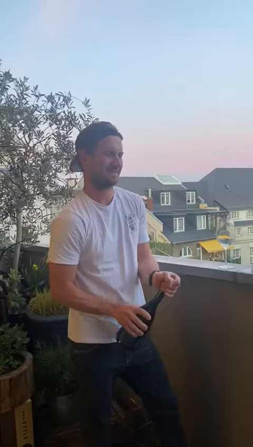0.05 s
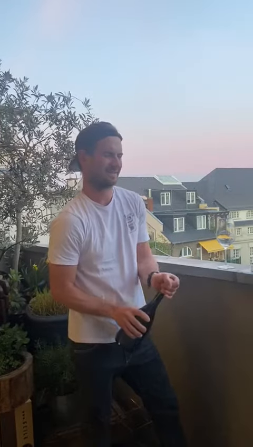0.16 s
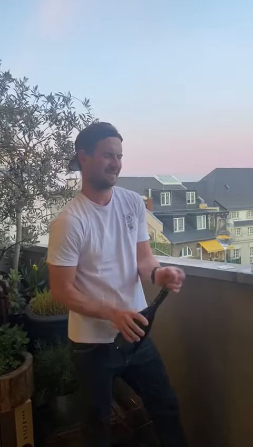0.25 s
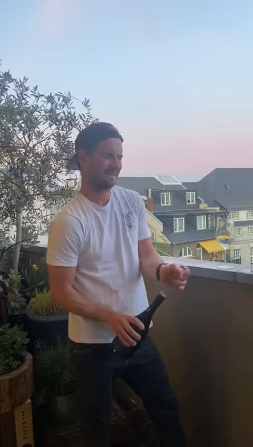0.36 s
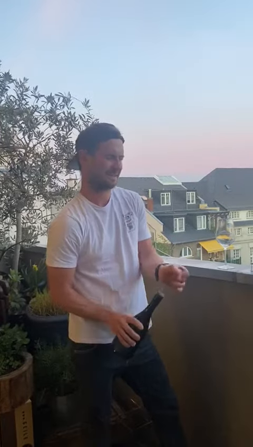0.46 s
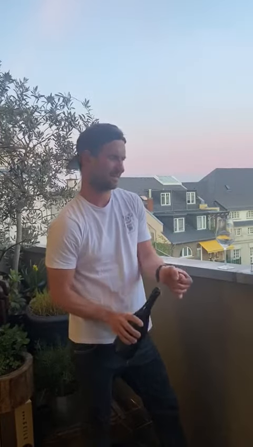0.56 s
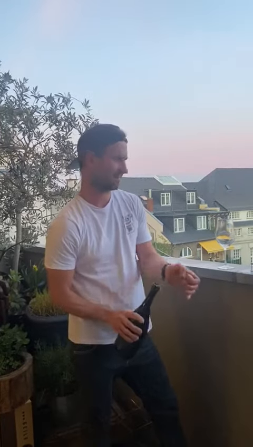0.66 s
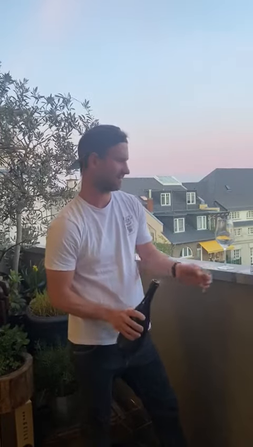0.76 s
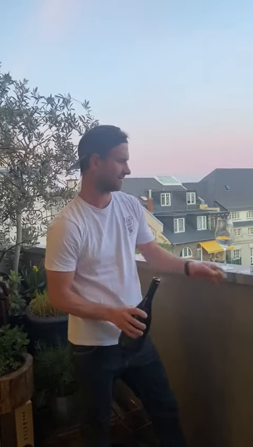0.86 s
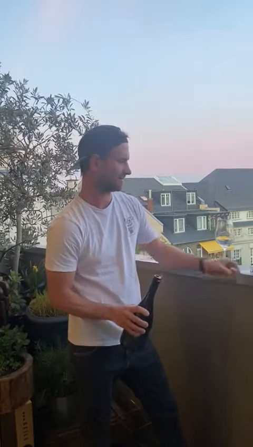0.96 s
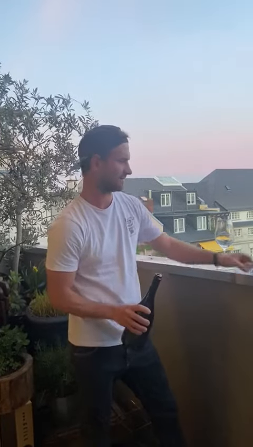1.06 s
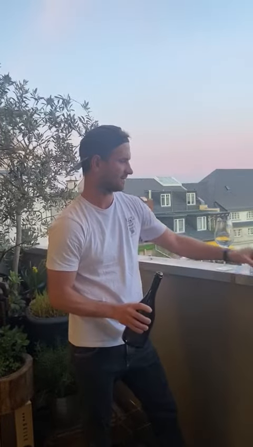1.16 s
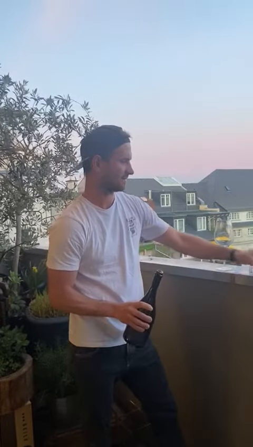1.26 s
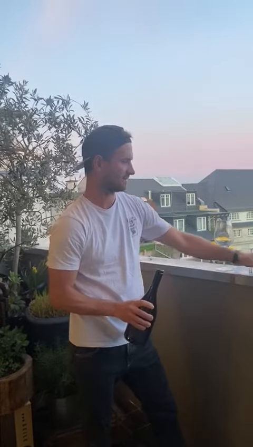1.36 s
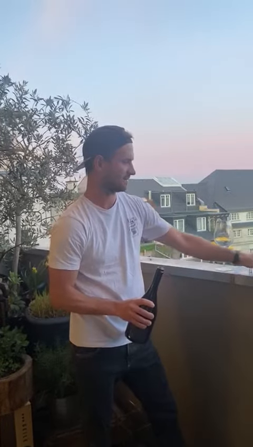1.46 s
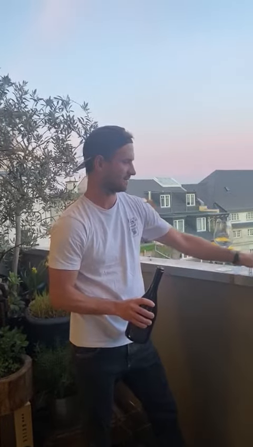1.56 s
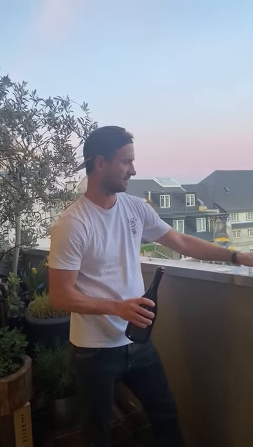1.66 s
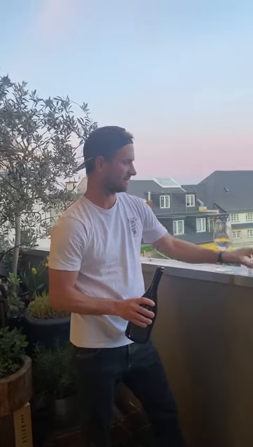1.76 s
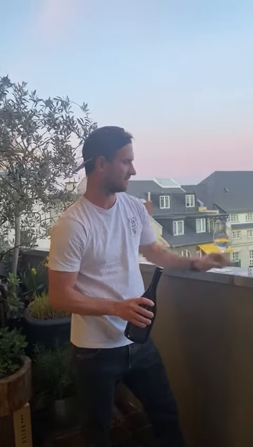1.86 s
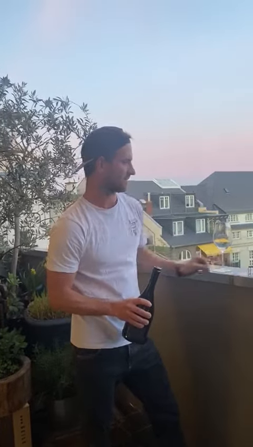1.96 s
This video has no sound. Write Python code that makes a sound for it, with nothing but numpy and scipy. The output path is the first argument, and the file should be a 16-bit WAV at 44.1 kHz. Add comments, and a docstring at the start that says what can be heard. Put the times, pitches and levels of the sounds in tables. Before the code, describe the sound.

Close stereo pickup on an open balcony: one loud cork pop almost at once, brief hiss and fading hollow note, soft echoes from houses opposite, near quiet, then a faint click and scuff of a small object.

```python
"""A town rumbles far off throughout: coloured noise, with faint sine tones late on.
At 0.23 s a cork pops from a sparkling wine bottle on a balcony: noise bursts crack as the seal breaks, decaying
sines thump as the neck's air bounces, and glass, gas hiss and a hollow note follow. Near walls repeat the crack
and thump, a corner honks, the balcony and courtyard add noise tails, and houses send back two soft echoes.
From 1.58 s something small clicks, clinks and scuffs on the parapet under a hand: noise bursts and struck modes."""
import sys
import numpy as np
from scipy import signal
from scipy.fft import rfft, irfft, next_fast_len
from scipy.io import wavfile
from scipy.ndimage import map_coordinates

SR = 44100
rng = np.random.default_rng(int(sys.argv[2]) if len(sys.argv) > 2 else 0)


def to_wav(sig):
    """Store sig (one row per channel, or 1-D mono) as 16-bit WAV at the path in sys.argv[1].

    Samples outside -1..1 are clipped; the rate is SR.
    """
    pcm = np.clip(np.atleast_2d(sig), -1, 1) * 32767
    pcm = np.round(pcm).astype(np.int16)
    wavfile.write(sys.argv[1], SR, pcm.T)  # frames by channels


N = 88200  # samples, two seconds


def amp(db):
    """Decibels to gain."""
    return 10 ** (np.asarray(db) / 20)


def unit(x):
    """Scale to rms 1."""
    return x / np.sqrt(np.mean(x ** 2) + 1e-20)


def along(points, hz):
    """Read a curve of (Hz, value) points on a log frequency axis."""
    f, v = np.transpose(points)
    return np.interp(np.log(hz + 1), np.log(f + 1), v)


def since(s):
    """Seconds since s, zero before."""
    return np.maximum(np.arange(N) / SR - s, 0)


def fade(t, t60):
    """Exponential decay that falls 60 dB in t60 seconds."""
    return np.exp(-np.log(1000) * t / t60)


def burst(s, rise, t60):
    """An envelope that rises at s and dies away."""
    t = since(s)
    return (1 - np.exp(-t / rise)) * fade(t, t60)


def swell(s, width):
    """A bell-shaped envelope around s."""
    return np.exp(-.5 * ((since(0) - s) / width) ** 2)


def wobble(rate):
    """A smooth random curve, rate knots a second."""
    return map_coordinates(rng.standard_normal(N), [np.arange(N) * rate / SR])


def sine(hz):
    """A sine that follows a moving pitch."""
    return np.sin(2 * np.pi * np.cumsum(hz) / SR)


def filtered(x, response):
    """x times a complex response of frequency."""
    m = next_fast_len(N + SR // 2)
    return irfft(rfft(x, m) * response(np.fft.rfftfreq(m, 1 / SR)), m)[..., :N]


def delayed(x, s):
    """x, s seconds later, by a phase turn that allows fractions of a sample."""
    return filtered(x, lambda hz: np.exp(-2j * np.pi * hz * s))


def noise(spectrum, alike):
    """Coloured stereo noise of rms 1; mid and side are weighted for the likeness of the two channels."""
    def mid_side_gains(hz):
        turn = np.arccos(np.clip(along(alike, hz), -1, 1)) / 2
        return amp(along(spectrum, hz)) * np.array([np.cos(turn), np.sin(turn)])

    mid, side = filtered(rng.standard_normal((2, N)), mid_side_gains)
    return unit(np.array([mid + side, mid - side]))


def struck(modes, s):
    """Modes set ringing at s, each with its own level offset and phase in each channel."""
    t = since(s)
    total = 0
    for hz, db, t60 in modes:
        level = amp(db + rng.normal(0, 1.5, (2, 1)))
        phase = rng.random((2, 1))  # in cycles
        total = total + level * burst(s, .0005, t60) * np.sin(2 * np.pi * (hz * t + phase))
    return total


POP_S = .2268  # the seal breaks
CRACK_DB, CRACK_RISE_S, CRACK_T60_S = -9, .00018, .018
# Colour of the crack. Each row: frequency in Hz, relative level in dB per Hz.
CRACK_COLOUR = [(300, -14), (700, 3), (950, 6), (1300, 2), (2000, 2.5), (3200, -1), (5500, -3), (7500, -11),
                (9000, -4), (11500, -7)]
# Stereo likeness of direct sounds. Each row: frequency in Hz, left-right correlation (1 is identical).
DIRECT_ALIKE = [(500, .97), (1100, .8), (2000, .15), (10000, .2)]


def crack():
    """The breaking seal gives a fast-rising burst of noise."""
    return amp(CRACK_DB) * burst(POP_S, CRACK_RISE_S, CRACK_T60_S) * noise(CRACK_COLOUR, DIRECT_ALIKE)


SNAP_DB, SNAP_RISE_S, SNAP_T60_S = -5.5, .0016, .0065
# Colour of the first instant. Each row: frequency in Hz, relative level in dB per Hz.
SNAP_COLOUR = [(600, -8), (1200, 3), (3000, 1), (5500, 2), (7500, -9), (10500, -1)]


def snap():
    """The first instant of the pop is a very short noise burst, heard only directly."""
    return amp(SNAP_DB) * burst(POP_S, SNAP_RISE_S, SNAP_T60_S) * noise(SNAP_COLOUR, DIRECT_ALIKE)


THUMP_S, THUMP_RISE_S = .2295, .00092  # the cork clears the neck just after the crack
# Resonances of the air in neck and bottle. Each row: frequency in Hz, level in dB, t60 in seconds.
NECK_MODES = [(170, -16, 0.058), (258, -12, .06), (343, 0, .052), (494, -11, .045), (565, -18, .04)]


def thump():
    """The air in the neck bounces at its resonances as the cork leaves."""
    t = since(THUMP_S)
    modes = [amp(db) * burst(THUMP_S, THUMP_RISE_S, t60) * np.sin(2 * np.pi * hz * t)
             for hz, db, t60 in NECK_MODES]
    return -sum(modes)  # starts with a downward swing


BOOM_HZ, BOOM_DB, BOOM_RISE_S, BOOM_T60_S = 79, -11.5, .011, .085


def boom():
    """The air in the bottle's shoulder gives a slower, deeper bounce."""
    return -amp(BOOM_DB) * burst(THUMP_S, BOOM_RISE_S, BOOM_T60_S) * np.sin(2 * np.pi * BOOM_HZ * since(THUMP_S))


# Near walls. Each row: delay in seconds, gain of the thump in dB, gain of the crack in dB.
WALLS = [(.0044, -2, -4), (.0095, -11.5, -7), (.0113, -9, -3), (.0133, -28.5, -4), (.015, -13.5, -16),
         (.0200, -27.5, -14)]


def wall_slaps(thump_sound, crack_sound):
    """Each near wall returns the thump and the crack after its own delay."""
    return sum(delayed(amp(thump_db) * thump_sound + amp(crack_db) * crack_sound, delay)
               for delay, thump_db, crack_db in WALLS)


# Modes of the bottle's glass. Each row: frequency in Hz, middle level in dB, t60 in seconds.
GLASS_MODES = [(706, -35, .2), (2118, -40, .33), (2299, -44, .28), (3015, -31, .13), (3413, -37, .15),
               (3880, -36, .12), (4387, -41, .13), (5300, -42, .16), (5771, -44, .16)]


def pop():
    """The seal cracks, the neck's air bounces, near walls repeat both, and the glass rings on."""
    crack_sound = crack()
    thump_sound = thump()
    slaps = wall_slaps(thump_sound, crack_sound)
    return snap() + crack_sound + thump_sound + boom() + slaps + struck(GLASS_MODES, POP_S)


HISS_DB, HISS_RISE_S, HISS_T60_S = -20, .003, .17
# Colour of the escaping gas. Each row: frequency in Hz, relative level in dB per Hz.
HISS_COLOUR = [(500, -18), (700, -2), (860, -10), (1100, -2), (2200, -1), (3500, -2), (5700, -6),
               (7600, -22), (8700, -4), (11000, -5), (12000, -11)]


def gas():
    """Gas leaves the open neck as a short hiss of noise."""
    return amp(HISS_DB) * burst(POP_S, HISS_RISE_S, HISS_T60_S) * noise(HISS_COLOUR, DIRECT_ALIKE)


RING_HZ, RING_SAG_HZ_PER_S, RING_RISE_S = 597, 16, .06  # pitch at the pop, then sinking
RING_WAVER_HZ, RING_FLUTTER_DB = 4, 2.8  # scale of the random pitch and level movement
# Quick and slow decay of the hollow note. Each row: level in dB, t60 in seconds.
RING_DECAYS = [(-24, .44), (-46, 1.8)]


def hollow_note():
    """A sinking, wavering sine lingers after the pop, with a quick and a slow decay."""
    pitch = RING_HZ - RING_SAG_HZ_PER_S * since(POP_S) + RING_WAVER_HZ * wobble(45)
    decay = sum(amp(db) * burst(POP_S, RING_RISE_S, t60) for db, t60 in RING_DECAYS)
    return decay * amp(RING_FLUTTER_DB * wobble(35)) * sine(pitch)


# Path of the whistle. Each row: time in seconds, pitch in Hz before wavering, rms level in dB.
WHISTLE_PATH = [(.25, 1010, -60), (.28, 1018, -50), (.335, 1042, -52), (.39, 1000, -52), (.45, 982, -58),
                (.52, 986.2, -72)]


def whistle():
    """A faint sine in the tail glides from point to point and wavers."""
    s, hz, db = np.transpose(WHISTLE_PATH)
    pitch = np.interp(since(0), s, hz) + 12 * wobble(80)
    level = np.interp(since(0), s, amp(db), left=0, right=0)
    return level * np.sqrt(2) * sine(pitch)  # root 2 turns rms into peak


HONK_S, HONK_RISE_S, HONK_T60_S, HONK_DB = .2365, .002, .03, -5
# Colour of the corner's honk. Each row: frequency in Hz, relative level in dB per Hz.
HONK_COLOUR = [(250, -50), (400, -20), (470, 0), (590, 0), (680, -25), (1200, -70)]
# Stereo likeness of reflected sound. Each row: frequency in Hz, left-right correlation.
TAIL_ALIKE = [(200, 1), (330, .9), (550, .3), (1400, .35), (4000, -.1), (12000, 0)]


def corner():
    """The balcony's corner throws back a hollow note, a short band of noise."""
    return amp(HONK_DB) * burst(HONK_S, HONK_RISE_S, HONK_T60_S) * noise(HONK_COLOUR, TAIL_ALIKE)


def reverberation(spectrum, t60s, rise):
    """A diffuse noise tail after the pop; each frequency dies at its own speed."""
    hz, t, bins = signal.stft(noise(spectrum, TAIL_ALIKE), SR, nperseg=512)
    decay = fade(np.maximum(t - POP_S, 0), along(t60s, hz)[:, None])
    tail = signal.istft(bins * decay, SR)[1][:, :N]
    return tail * (1 - np.exp(-(since(POP_S) / rise) ** 2))


BALCONY_DB, BALCONY_RISE_S = -17.5, .008
# Colour of the balcony's tail. Each row: frequency in Hz, relative level in dB per Hz.
BALCONY_COLOUR = [(40, -16), (80, -5), (160, 1), (340, -3), (540, -6.5), (700, -14), (860, -22),
                  (1050, -12), (1300, -21), (2100, -19), (3200, -21), (5700, -29), (7000, -45)]
# Decay of the balcony's tail. Each row: frequency in Hz, t60 in seconds.
BALCONY_T60 = [(80, .3), (400, 0.23), (1500, .22), (6000, .2)]


def balcony():
    """The balcony rings briefly with a short reverberation."""
    return amp(BALCONY_DB) * reverberation(BALCONY_COLOUR, BALCONY_T60, BALCONY_RISE_S)


YARD_DB, YARD_RISE_S = -35.3, .065
# Colour of the courtyard's tail. Each row: frequency in Hz, relative level in dB per Hz.
YARD_COLOUR = [(50, -12), (150, -7), (330, 0), (520, -3), (680, -13), (870, -26), (1030, -15), (1400, -23),
               (2100, -16), (2600, -20), (5400, -21), (6300, -24), (7000, -55), (8000, -50), (8800, -28),
               (12000, -36)]
# Decay of the courtyard's tail. Each row: frequency in Hz, t60 in seconds.
YARD_T60 = [(100, 1.4), (400, 1.4), (1500, 1.09), (4000, .75), (10000, .55)]


def courtyard():
    """The courtyard answers with a slower, longer reverberation."""
    return amp(YARD_DB) * reverberation(YARD_COLOUR, YARD_T60, YARD_RISE_S)


# Returns from the houses opposite. Each row: middle in seconds, bell width (sigma) in seconds, level in dB.
ECHOES = [(.45, .05, -57), (.64, .06, -68.5)]
# Colour of the returns. Each row: frequency in Hz, relative level in dB per Hz.
ECHO_COLOUR = [(300, -3), (900, -6), (2000, 5.5), (2700, -3), (3800, -1), (5800, -5), (7000, -35),
               (9500, -17), (12000, -25)]


def house_echoes():
    """The houses opposite return the crack as soft swells of noise."""
    swells = sum(amp(db) * swell(s, width) for s, width, db in ECHOES)
    return swells * noise(ECHO_COLOUR, TAIL_ALIKE)


# Contacts on the parapet. Each row: start in seconds, level in dB, t60 of the noise in seconds.
CONTACTS = [(1.5795, -37.5, .014), (1.586, -38.5, .014), (1.598, -51, .025), (1.629, -50, .02),
            (1.644, -51, 0.028)]
# Colour of the contacts. Each row: frequency in Hz, relative level in dB per Hz.
CLICK_COLOUR = [(350, -49), (600, -27), (752, -16), (831, -13), (1040, -14.5), (1700, -1.5), (2410, -4),
                (3180, -15), (3740, -8.5), (6020, -20.5), (7270, -42), (9460, -23.5), (12000, -29),
                (15600, -61), (22000, -120)]
# Modes of the small object. Each row: frequency in Hz, middle level against its contact in dB, t60 in seconds.
CLINK_MODES = [(1545, -23, .2), (1690, -14, .1), (2019, -21, .2), (2369, -15, .14), (3650, -25, .2),
               (3946, -26, .2)]
CLICK_TAIL_DB, CLICK_TAIL_RISE_S, CLICK_TAIL_T60_S = -46.5, .0037, .27


def clicks():
    """A small object taps the parapet: noise bursts, struck modes and a short tail from the balcony."""
    taps = sum(amp(db) * burst(s, .00035, t60) for s, db, t60 in CONTACTS) * noise(CLICK_COLOUR, DIRECT_ALIKE)
    clink = sum(amp(db) * struck(CLINK_MODES, s) for s, db, _ in CONTACTS)
    tail_envelope = burst(CONTACTS[0][0], CLICK_TAIL_RISE_S, CLICK_TAIL_T60_S)
    tail = amp(CLICK_TAIL_DB) * tail_envelope * noise(CLICK_COLOUR, TAIL_ALIKE)
    return taps + clink + tail


SCUFF_S, SCUFF_RISE_S, SCUFF_T60_S, SCUFF_DB = 1.626, .015, .12, -42.5
# Colour of the scuff. Each row: frequency in Hz, relative level in dB per Hz.
SCUFF_COLOUR = [(450, -25), (800, 8), (1100, 0), (1700, 7), (2600, -10), (6000, -30)]


def scuff():
    """The object slides a little: a softer-edged burst of noise."""
    return amp(SCUFF_DB) * burst(SCUFF_S, SCUFF_RISE_S, SCUFF_T60_S) * noise(SCUFF_COLOUR, DIRECT_ALIKE)


TOWN_DB = -56.5
PORT_LAG_S = .00017  # the town reaches the left port later
# Colour of the distant town. Each row: frequency in Hz, relative level in dB per Hz.
TOWN_COLOUR = [(13, -47.5), (22, -27), (37, -8), (60, 0.5), (181, -12.5), (277, -9), (315, -17), (341, -15),
               (678, -22), (753, -20), (1060, -20.5), (2970, -34), (5030, -36.5), (6210, -42),
               (6900, -67.5), (9720, -48), (12000, -52.5), (15600, -80), (22000, -120)]
# Stereo likeness of the town. Each row: frequency in Hz, left-right correlation before the lag.
TOWN_ALIKE = [(100, 1), (200, .95), (500, .55), (1500, .5), (4000, .35), (12000, .2)]
# Faint far tones. Each row: middle in seconds, bell width (sigma) in seconds, middle pitch in Hz, level in dB.
FAR_TONES = [(1.758, 0.092, 285, -62), (1.836, 0.014, 757, -60), (1.944, 0.018, 747, -62)]


def town():
    """Steady distant traffic is coloured noise, with a few faint wavering tones."""
    traffic = amp(TOWN_DB) * noise(TOWN_COLOUR, TOWN_ALIKE)
    tones = sum(amp(db) * swell(s, width) * sine(hz + 4 * wobble(39.87)) for s, width, hz, db in FAR_TONES)
    return delayed(traffic + tones, np.array([[.5], [-.5]]) * PORT_LAG_S)


def scene():
    """Everything heard on the balcony."""
    bottle = pop() + gas() + hollow_note() + whistle()
    surroundings = corner() + balcony() + courtyard() + house_echoes()
    return bottle + surroundings + clicks() + scuff() + town()


CLIP_TOP, TOP_HZ = .92, 11950  # peak ceiling (full scale is 1), band limit in Hz


def record(dry):
    """The recorder rounds off the highest peaks and cuts steeply above its band limit."""
    rounded = dry / (1 + np.abs(dry / CLIP_TOP) ** 6) ** (1 / 6)
    return filtered(rounded, lambda hz: 1 / np.sqrt(1 + (hz / TOP_HZ) ** 200))


dry = scene()
out = record(dry)
to_wav(out)
```